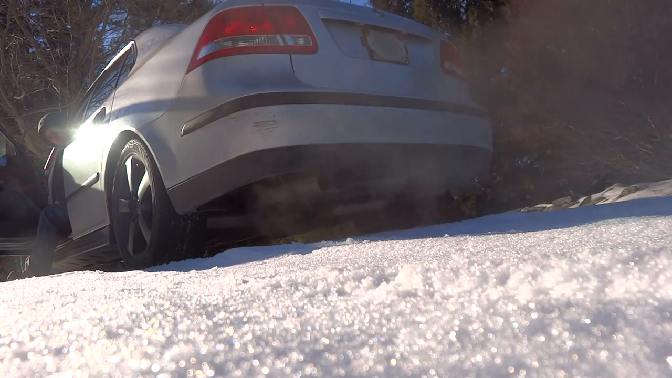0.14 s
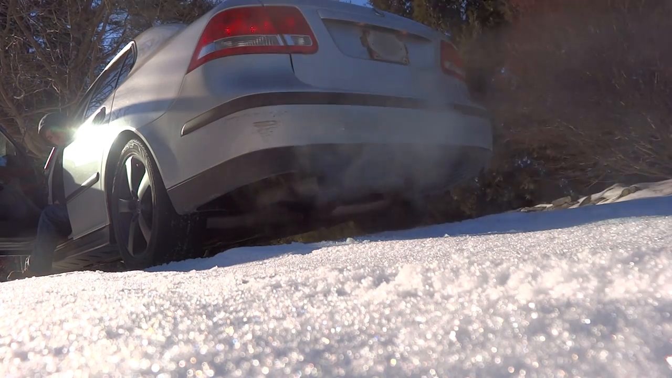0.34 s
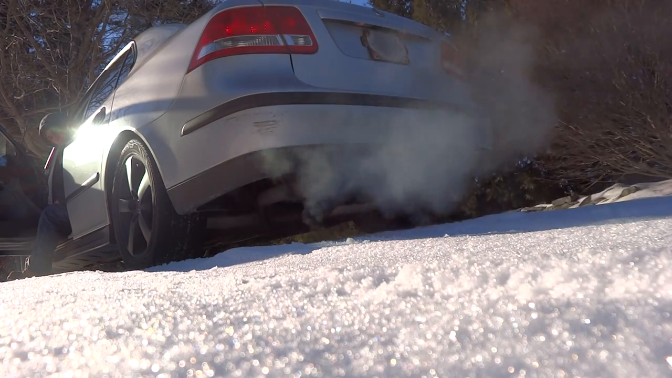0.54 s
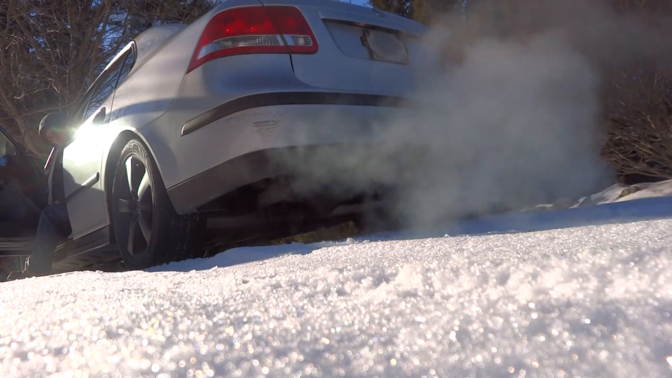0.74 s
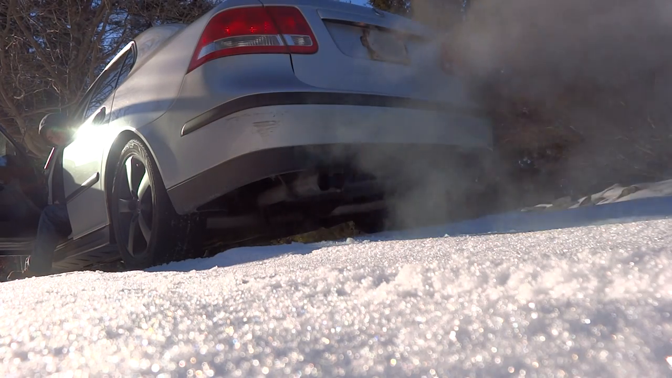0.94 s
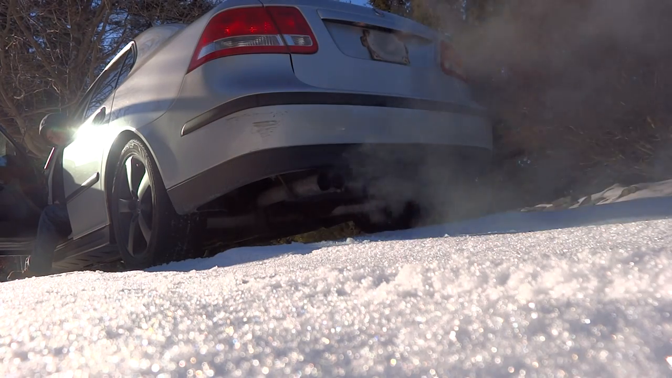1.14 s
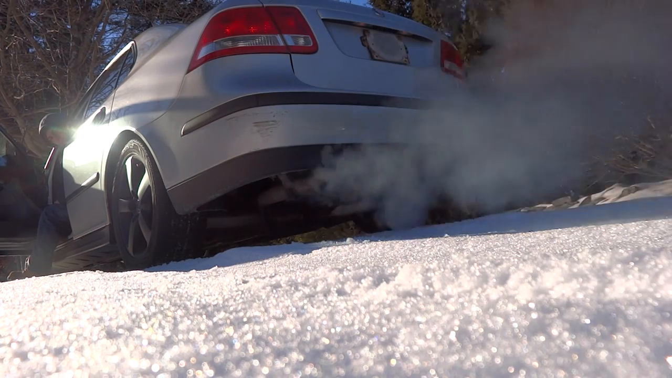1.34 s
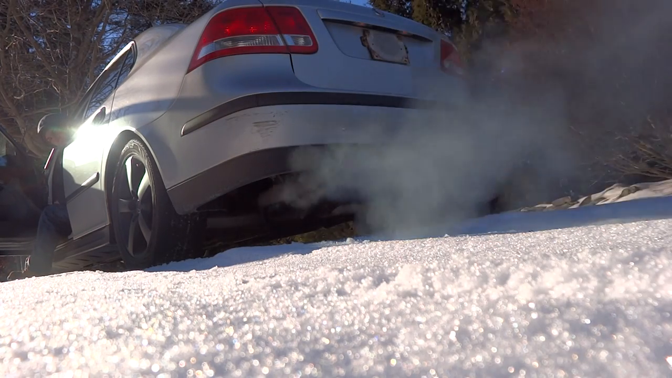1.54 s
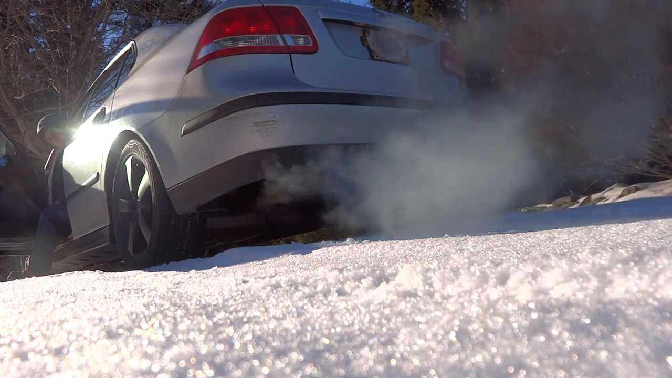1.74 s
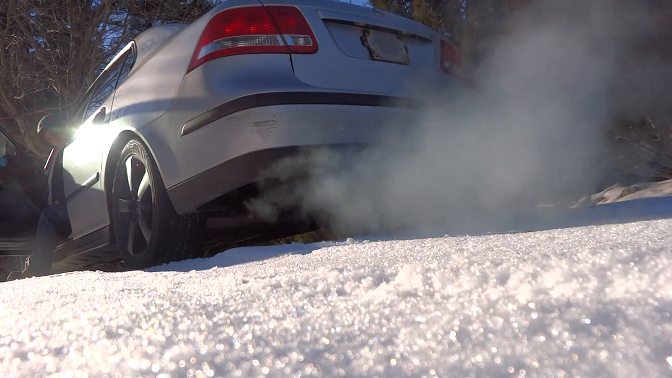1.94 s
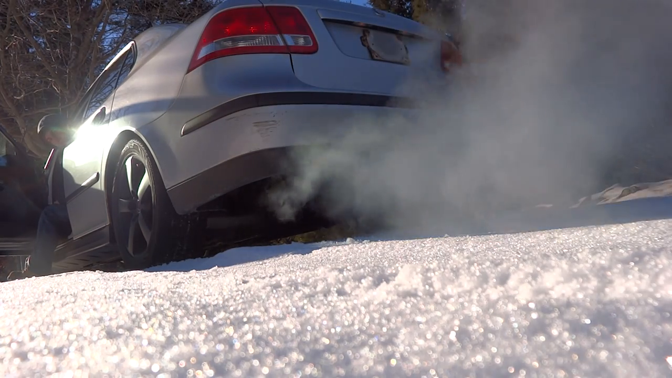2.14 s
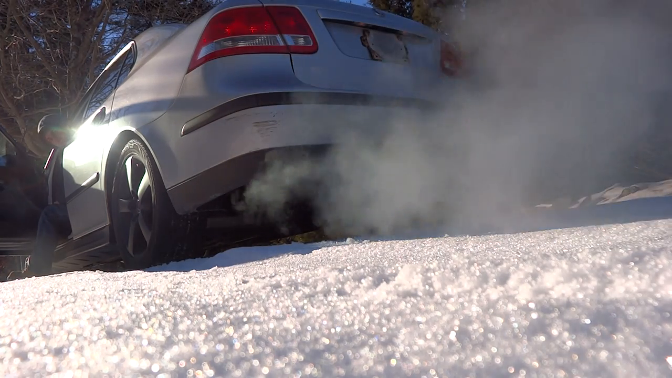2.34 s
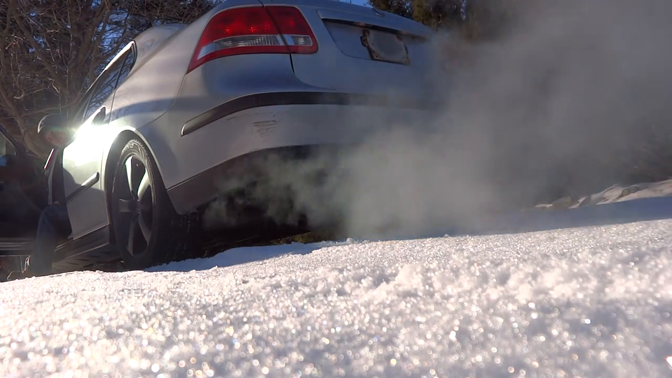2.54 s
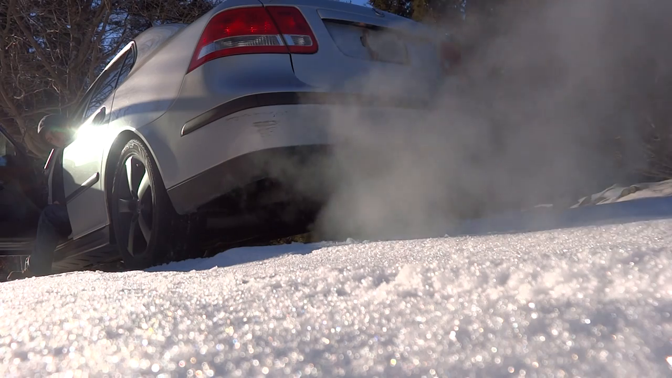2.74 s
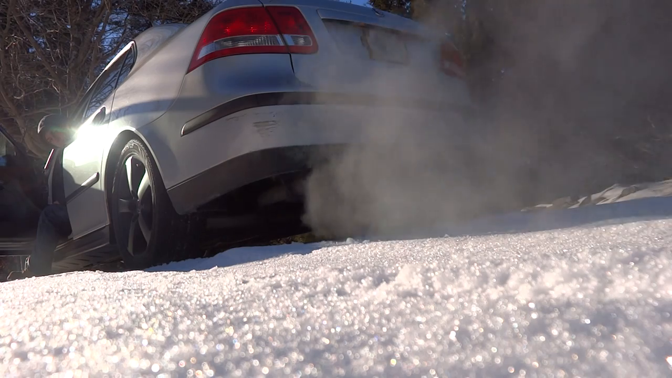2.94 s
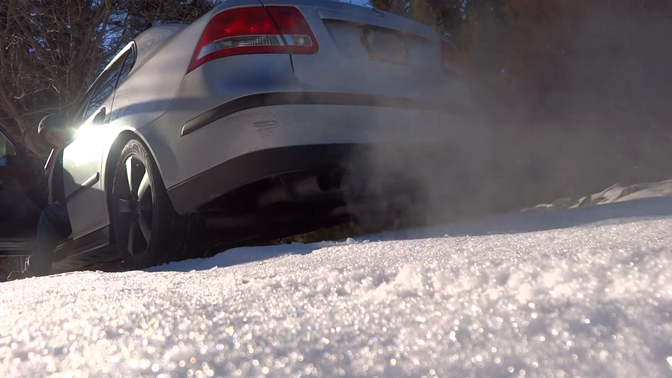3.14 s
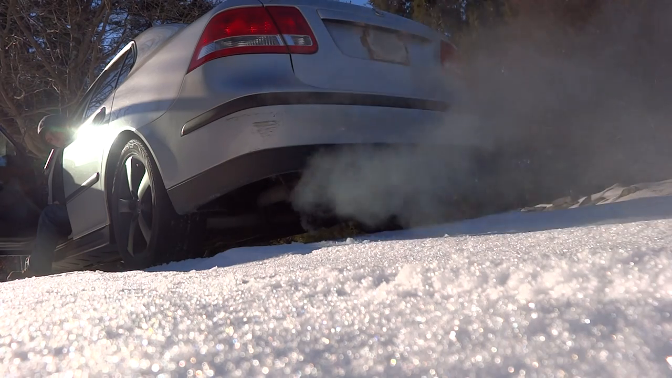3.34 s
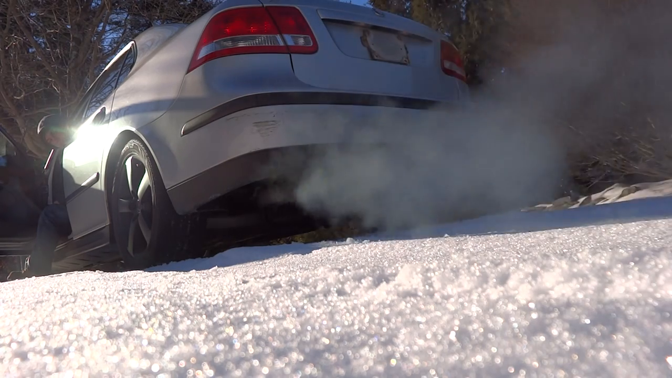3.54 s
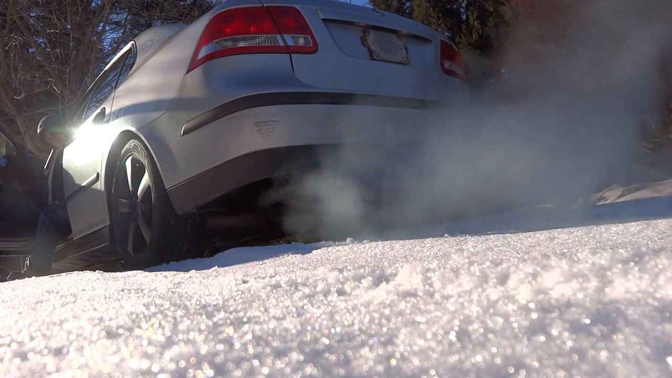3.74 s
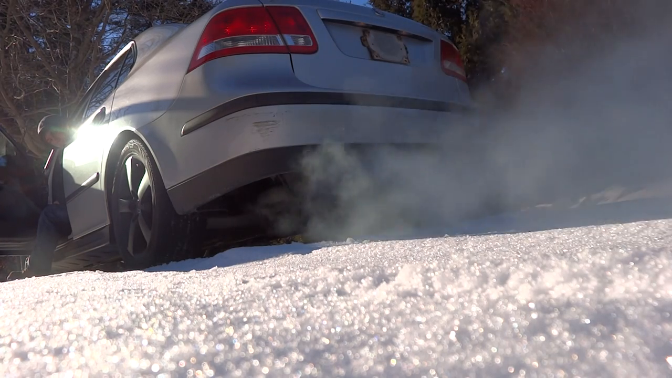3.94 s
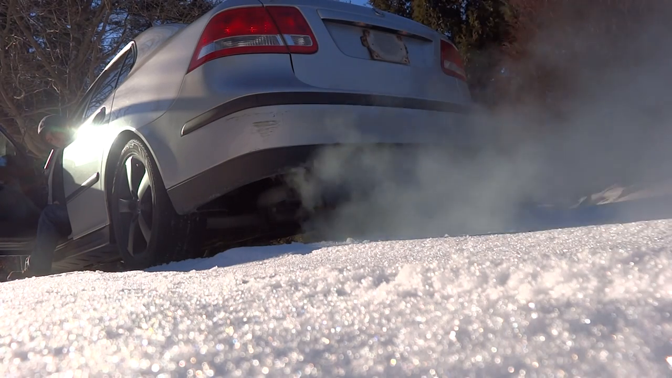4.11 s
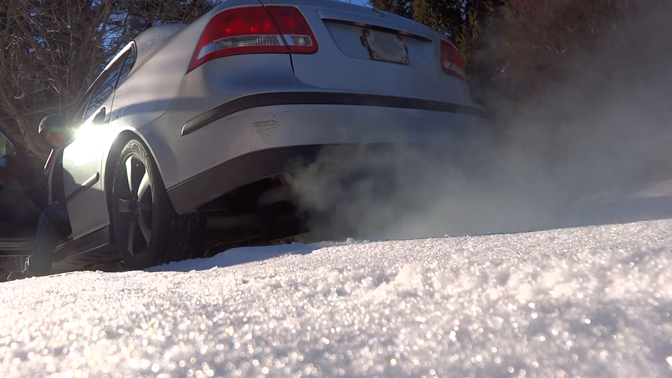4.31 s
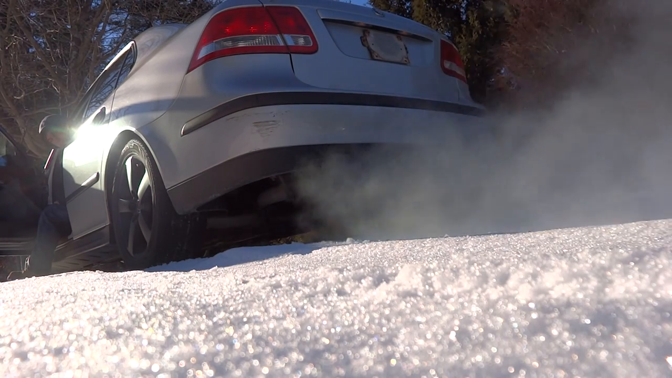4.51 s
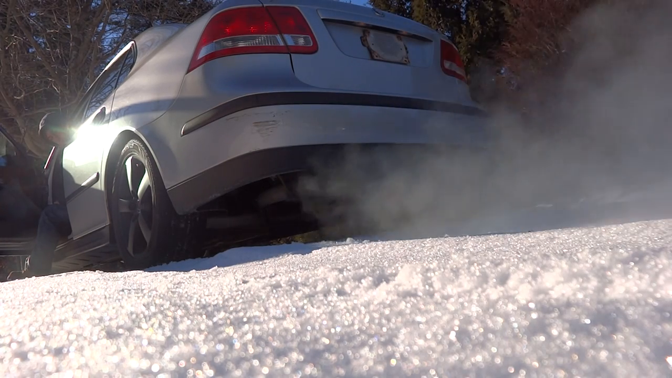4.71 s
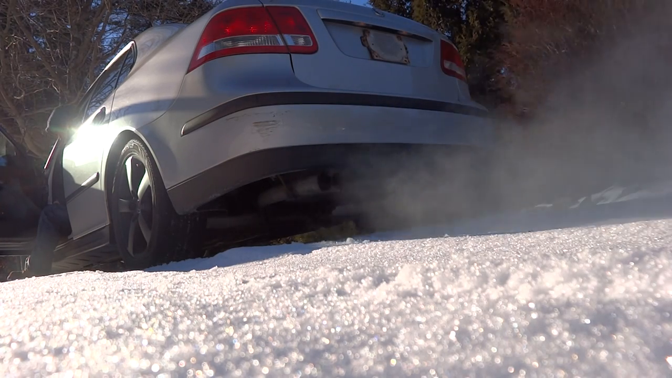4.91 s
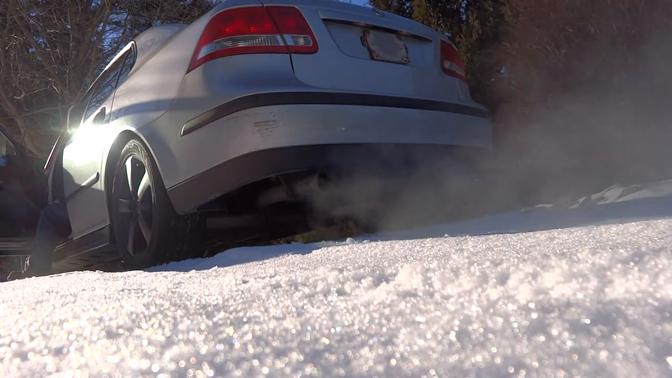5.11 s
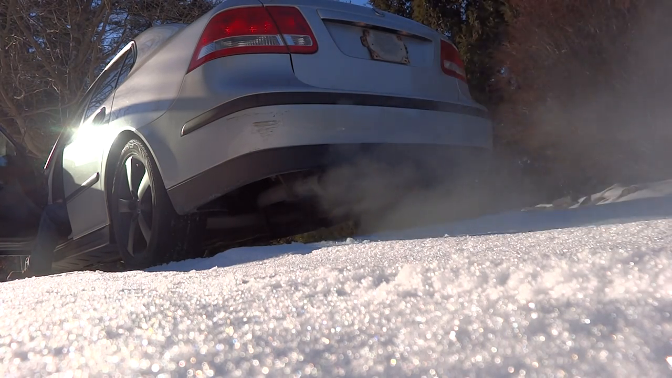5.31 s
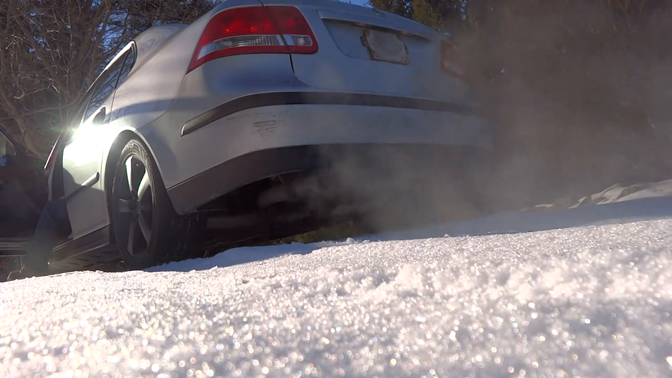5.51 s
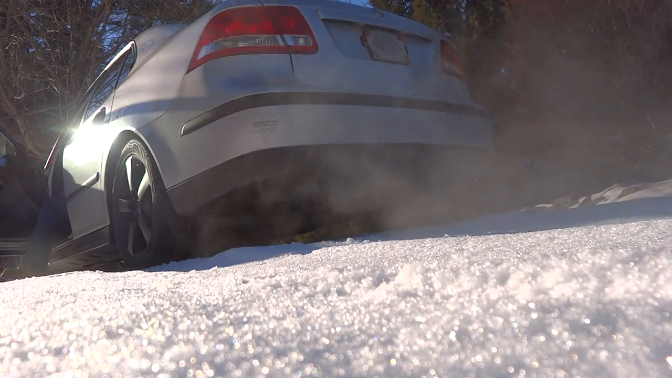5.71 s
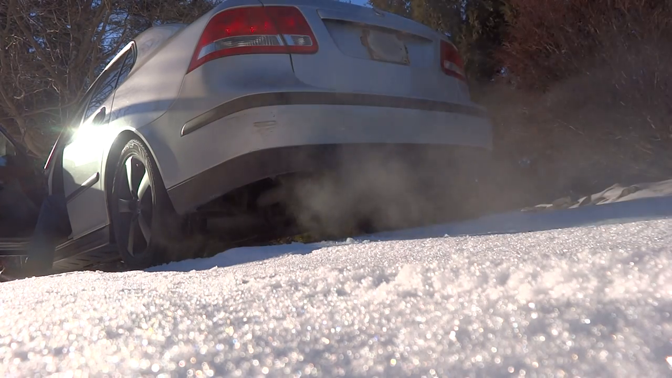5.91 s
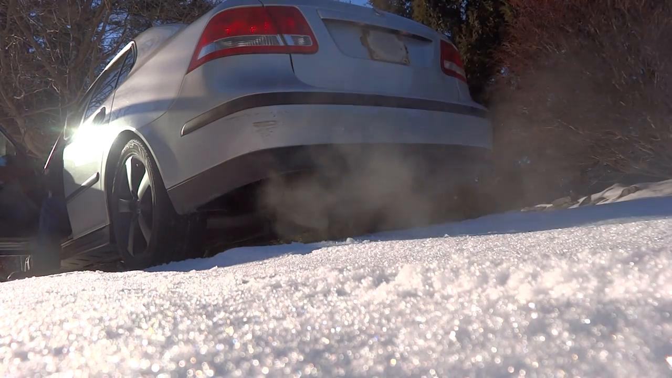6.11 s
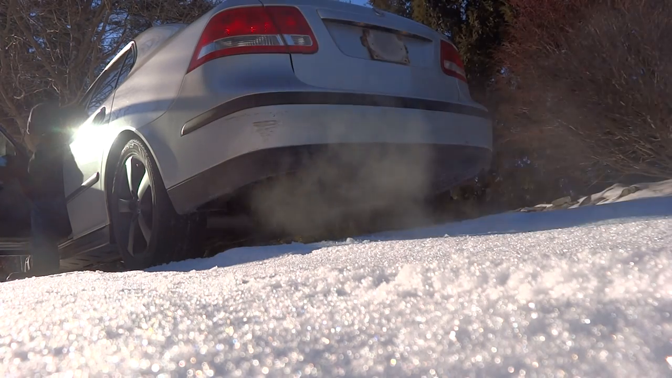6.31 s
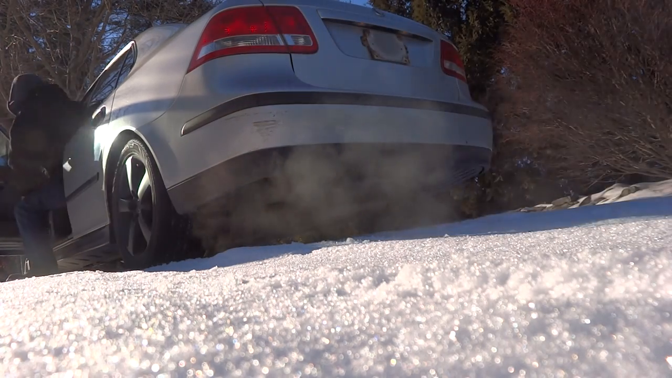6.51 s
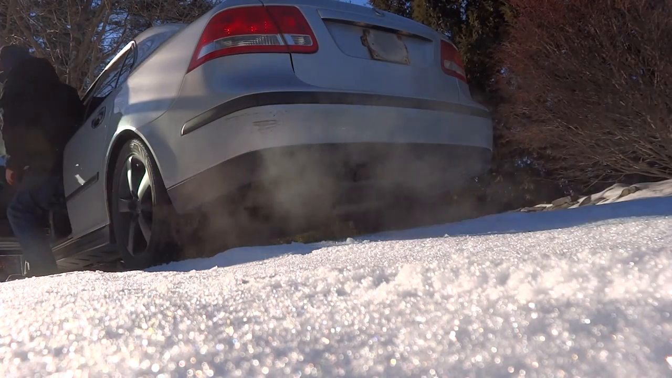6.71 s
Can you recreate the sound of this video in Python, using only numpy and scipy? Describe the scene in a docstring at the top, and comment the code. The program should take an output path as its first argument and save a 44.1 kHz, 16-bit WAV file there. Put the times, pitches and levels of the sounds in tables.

```python
"""A four-cylinder car, heard from behind its exhaust on snow, revs, falls back and sinks to idle.
Each firing sends a pulse down the pipe, which booms when the pulses match one of its own pitches.
The exhaust tips rasp under throttle, burble and crack when it is lifted, and hiss with the gas flow.
At idle a thin whistle glides down. Faint outdoor air lies behind it all."""
import sys
import numpy as np
from scipy import signal
from scipy.fft import irfft
from scipy.io import wavfile
from scipy.ndimage import uniform_filter1d

SR = 44100
rng = np.random.default_rng(int(sys.argv[2]) if len(sys.argv) > 2 else 0)


def output_pcm(signal):
    """Save a mono or channel-first signal as 16-bit PCM at the path in sys.argv[1].

    Samples are clipped to [-1, 1] before scaling.
    """
    pcm = np.clip(np.atleast_2d(signal).T, -1, 1) * 32767
    wavfile.write(sys.argv[1], SR, np.round(pcm).astype(np.int16))


N = 298116
TIME = np.arange(N) / SR
BINS = np.fft.rfftfreq(16384, 1 / SR)  # the pitches at which filters are set, in Hz


# The pitches the pipe rings at (standing waves): pitch_hz, width_hz, relative_db
PIPE_RINGS = [(65.3, 31, -10.5), (109, 34, -6), (152, 24.3, -8), (180.5, 42, -12.5), (235.1, 26.5, -3),
              (285.3, 14.5, -5), (333.1, 45.6, -7.5), (384.5, 19, -10.5), (427, 26.7, -12.5),
              (503.5, 64, -13.5), (565, 34, -17), (641, 73.7, -21), (753, 79, -28.5), (798, 250, -38)]
def pipe_gain(state, leak_db=-44, notch_hz=508, notch_width_hz=15, notch_depth=0.98, top_hz=1700):
    """The pipe as a filter: it rings, lets a little straight through, and its silencer swallows a pitch."""
    cool_hz = BINS / state["stretch"]
    rings = sum(amp(db) ** 2 / (1 + (2 * (cool_hz - hz) / (width * state["widen"])) ** 2) ** 2
                for hz, width, db in PIPE_RINGS)
    pipe = np.sqrt(rings + amp(leak_db) ** 2)
    pipe *= 1 - notch_depth / (1 + ((BINS - notch_hz) / notch_width_hz) ** 2)
    return pipe / np.sqrt((1 + (BINS / top_hz) ** 8) * (1 + (state["low_cut_hz"] / (BINS + 1)) ** 4))


def exhaust_note(count, strength, suck=0.53, swirl=0.045, rough_swirl=0.55, stumble_db=-2, burn_db=2):
    """The main boom: one push of pressure per firing, mixed with swirling gas, rings the pipe."""
    coasting = shares()[0]
    cycle = np.cos(2 * np.pi * count)
    softness = setting("softness") + 0.44 * octaves() * coasting - 0.8 * afterburn()
    r = amp(-np.maximum(softness, .5))  # size of each overtone next to the one below
    pulse = 1 / (1 - 2 * r * cycle + r ** 2) - 1 / (1 + r) ** 2
    pulse *= (1 - r ** 2) / r  # keeps the lowest tone equally loud at any softness
    mean = 2 / (1 + r)
    eddies = colour(noise(), spectrum([(30, 1), (120, 9), (350, 25.3), (700, 22.5), (1500, 2)]))
    gusts = np.sqrt(.25 + abs(pulse) / mean)
    suction = suck * coasting * cycle  # a shut throttle pumps the gas smoothly to and fro
    drive = (pulse - mean) * strength + suction + (swirl + rough_swirl * roughness()) * eddies * gusts
    drive *= amp(level("note") + stumble_db * stumbling() + burn_db * afterburn())
    return sum(colour(drive * share, pipe_gain(state)) for share, state in zip(shares(), STATES))


# How each cylinder differs at full imbalance, in firing order: extra_strength, late_firings
CYLINDER_QUIRKS = [(0.08, 0.032), (-0.16, -.08), (-0.16, 0.095), (0.063, -0.042)]
def firings(scatter=0.42, jitter=0.14):
    """A running count of firings and their strength; uneven cylinders and rough burning upset both."""
    imbalance, rough = setting("imbalance"), roughness()
    count = np.cumsum(firing_hz()) / SR + 0.15
    beats = np.arange(int(count[-1]) + 3)
    timing_luck, strength_luck = rng.standard_normal((len(beats), 2)).T
    extra, late = np.array(CYLINDER_QUIRKS)[beats % len(CYLINDER_QUIRKS)].T
    wobble = jitter * rough * np.interp(count, beats, timing_luck)
    count = count - imbalance * np.interp(count, beats, late) + wobble
    nearest = np.round(count).astype(int)
    return count, 1 + imbalance * extra[nearest] + scatter * rough * strength_luck[nearest]


# How fast the engine runs: time_s, firing_rate_hz
ENGINE_SPEED = [(0.0, 135), (0.08, 141.7), (0.14, 135.5), (0.66, 103.7), (0.69, 102.6), (0.78, 122.3),
                (1.0, 162.9), (1.13, 190.6), (1.23, 205.8), (1.3, 193.8), (1.8, 158.0), (2.2, 129.3),
                (2.66, 103.0), (2.78, 120.8), (3.11, 183.2), (3.24, 186.7), (3.9, 138.4), (4.3, 114.6),
                (4.8, 86.37), (5.4, 57.76), (5.75, 41.03), (5.95, 34.6), (6.25, 29.63), (6.76, 29.27)]
MID_HZ = 100
def firing_hz():
    """Firings per second at each moment."""
    return curves(ENGINE_SPEED)[0]


def octaves():
    """Engine speed in octaves (doublings) above MID_HZ."""
    return np.log2(firing_hz() / MID_HZ)


# Each stab of the throttle: pressed_s, lifted_s, stumble_end_s, afterburn_end_s
THROTTLE_STABS = [(-0.1, 0.095, 0.15, 0.375), (0.642, 1.212, 1.44, 1.33), (2.652, 3.19, 3.31, 3.36)]
def shares(idle_from_s=5.93):
    """How much the engine is coasting, pulling and idling, each from 0 to 1."""
    pulling = sum(during(pressed, lifted) for pressed, lifted, _, _ in THROTTLE_STABS)
    idling = during(idle_from_s, np.inf)  # fuel returns to hold the idle
    return 1 - pulling - idling, pulling, idling


def stumbling():
    """1 while the firing is ragged, just after the throttle lifts."""
    return sum(during(lifted, end) for _, lifted, end, _ in THROTTLE_STABS)


def afterburn():
    """1 while unburnt fuel burns in the pipe after the throttle lifts."""
    return sum(during(lifted, end) for _, lifted, _, end in THROTTLE_STABS)


def roughness():
    """How unevenly the fuel burns: most after a lift, and more as the engine coasts to a crawl."""
    return setting("rough") + 0.42 * stumbling() + 0.14 * shares()[0] * np.maximum(-octaves(), 0)


# The engine's states. _db: relative level at MID_HZ; _slope: dB gained per octave of speed;
# softness: dB lost per overtone; imbalance, rough: 0-1; low_cut_hz: burning firings lack bass;
# stretch, widen: factors by which hot, fast gas raises and widens the pipe's rings
COASTING = dict(note_db=-14, note_slope=8.6, softness=1.52, imbalance=0.17, rough=.08, stretch=1.005, widen=0.99, low_cut_hz=10, rasp_db=-51, rasp_slope=13.76, stream_db=-61, stream_slope=7.7)
PULLING = dict(note_db=-11, note_slope=5.2, softness=1.0, imbalance=.42, rough=0.032, stretch=1.061, widen=1.56, low_cut_hz=167, rasp_db=-38.5, rasp_slope=7.87, stream_db=-65, stream_slope=18)
IDLING = dict(note_db=-16.5, note_slope=0, softness=2.3, imbalance=0.053, rough=0.042, stretch=0.96, widen=1, low_cut_hz=120, rasp_db=-76, rasp_slope=0, stream_db=-97, stream_slope=0)
STATES = [COASTING, PULLING, IDLING]
def setting(name):
    """One engine setting, blended as the state changes."""
    return sum(share * state[name] for share, state in zip(shares(), STATES))


def level(layer):
    """A layer's base level in dB, following the engine's state and speed."""
    return setting(layer + "_db") + setting(layer + "_slope") * octaves()


# The tone of the rasp: pitch_hz, relative_db
RASP_TONE = [(300, -12), (700, 9), (1000, -3), (1400, -3), (1700, -1), (2400, -6.5), (3200, -9),
             (4200, -18.5), (5500, -25.5), (8000, -28.5), (16000, -53)]
def rasp(count, strength, puff_s=0.0032, between=0.15, lag=0.089, scatter_db=3, boost_db=4):
    """Each firing blows a puff of churning gas out of the tips."""
    beat, phase = np.divmod(count + 1 - lag, 1)
    age_s = phase / firing_hz()
    size = amp(scatter_db * noise()[beat.astype(int)]) * np.sqrt(abs(strength))
    puffs = noise() * (between + size * np.exp(-age_s / puff_s))
    return amp(rasp_level() + boost_db) * steady(colour(puffs, spectrum(RASP_TONE) * tailpipe()))


def rasp_level(chuff_db=-55, burn_db=6, stumble_db=-4, flare_hz=159, flare_width_hz=5, flare_db=5):
    """Rasp in dB grows with speed and fuel; coasting, it flares at one speed and keeps a dry chuff."""
    coasting = shares()[0]
    flare = flare_db * np.exp(-((firing_hz() - flare_hz) / flare_width_hz) ** 2)
    db = level("rasp") + burn_db * afterburn() + coasting * flare + stumble_db * stumbling()
    return 20 * np.log10(np.hypot(amp(db), coasting * amp(chuff_db)))


def tailpipe(round_trip_hz=454, echo=0.2):
    """A flipped echo from the open tip lifts evenly spaced bands of pitch."""
    return 1 / abs(1 + echo / (1 + (BINS / 4000) ** 2) * np.exp(2j * np.pi * BINS / round_trip_hz))


# The tone of the shock fronts: pitch_hz, relative_db
SHOCK_TONE = [(500, -7.5), (900, 4.5), (1500, 4.5), (3000, 6), (5000, -9), (6200, -17), (9000, -23.5),
              (16000, -50.5)]
def shocks(count, strength, scatter_db=4, shock_db=-40, full_rasp_db=-38, steepening=1.56):
    """Strong pulses steepen along the pipe into sharp clicks, which grow faster than the rasp."""
    fronts = np.diff(np.floor(count), prepend=0) * strength * amp(scatter_db * noise())
    level_db = shock_db + steepening * (rasp_level() - full_rasp_db)
    return amp(level_db) * steady(colour(fronts, spectrum(SHOCK_TONE) * tailpipe()))


# Bursts of unburnt fuel cracking in the pipe: start_s, length_s, relative_db, fade_db
CRACK_VOLLEYS = [(1.239, 0.03798, -22, -9.5), (1.354, 0.118, -21, -9), (3.104, 0.065, -35, -21),
                 (3.251, 0.0061, -26, 0), (3.274, 0.055, -33, -5)]
# The tone of a crack: pitch_hz, gain_db
CRACK_TONE = [(400, -1), (1500, 0), (3500, 3.5), (6000, -3.5), (9000, -6), (13000, -13), (16000, -27)]
def cracks(count, scatter_db=2, spit_s=0.00077, tail_s=0.01, tail=0.11, snap=3, trim_db=-3, size=900):
    """One crack per firing through each volley: a sharp snap with a short spit of noise behind it."""
    out, t = np.zeros(N + size), np.arange(size) / SR
    firing_s = np.flatnonzero(np.diff(np.floor(count)) > 0) / SR
    decay = np.exp(-t / spit_s) + tail * np.exp(-t / tail_s)
    for start, length, db, fade_db in CRACK_VOLLEYS:
        for s in firing_s[(firing_s >= start) & (firing_s < start + length)]:
            burst = rng.standard_normal(size) * decay + snap * (t == 0)
            level_db = db + trim_db + fade_db * (s - start) / length + scatter_db * rng.standard_normal()
            out[int(s * SR):][:size] += amp(level_db) * unit(burst)
    return colour(out[:N], spectrum(CRACK_TONE))


# The tone of the escaping gas: pitch_hz, relative_db
HISS_TONE = [(1000, 2), (4500, -8.5), (7000, -1), (9500, 1), (12000, 0.5), (13800, -2.5), (14800, -10.5),
             (16000, -26)]
def hiss(count, lag=0.41, surge_db=-39, surge_slope=-8, burn_db=7, least_db=-77, trim_db=-1.5):
    """Gas streams from the tips; while coasting, it surges when the firings match a ring of the pipe."""
    hz = firing_hz()
    stream = amp(level("stream") + burn_db * (afterburn() - stumbling()) + trim_db)
    ringing = np.interp(hz, BINS, pipe_gain(COASTING))
    surge = shares()[0] * amp(surge_db + surge_slope * octaves()) * ringing ** 1.85
    throb = 0.54 * (MID_HZ / hz) ** 0.47  # slow firings come as separate spurts
    flow = noise() * np.exp(throb * np.cos(2 * np.pi * (count - lag)))
    loudness = np.sqrt(stream ** 2 + surge ** 2 + amp(least_db) ** 2)
    return loudness * steady(colour(flow, spectrum(HISS_TONE)))


# The path of the whistle: time_s, pitch_hz, level_db
WHISTLE_GLIDE = [(5.3, 4999, -100), (5.65, 4700, -78), (5.85, 4400, -109), (5.95, 3970, -72),
                 (6.08, 3855, -72), (6.2, 3410, -80.5), (6.42, 2870, -79), (6.63, 2410, -59),
                 (6.76, 2400, -59)]
def whistle(count, width_hz=85, flutter=0.48):
    """A breathy whistle flutters with the firings and sinks as the engine settles."""
    hz, db = curves(WHISTLE_GLIDE)
    blur = 1 / (1 + (BINS / width_hz) ** 2)
    breath = colour(noise(), blur) + 1j * colour(noise(), blur)
    tone = (breath * np.exp(2j * np.pi * np.cumsum(hz) / SR)).real  # slides the noise up to the pitch
    return amp(db) * unit(tone * (1 + flutter * np.cos(2 * np.pi * count)))


def whine(pitch_hz=8350, level_db=-72, start_s=5.6):
    """A faint, steady high tone comes in near idle."""
    return amp(level_db) * during(start_s, np.inf) * unit(np.sin(2 * np.pi * pitch_hz * TIME))


# The tone of the background: pitch_hz, relative_db
AIR_TONE = [(20, -16.5), (100, -2), (300, -19), (700, -41), (2000, -34.5), (5000, -54), (9000, -40),
            (16000, -47)]
def outdoor_air(level_db=-60):
    """A quiet, even rumble."""
    return amp(level_db) * unit(colour(noise(), spectrum(AIR_TONE)))


def amp(db):
    """Decibels to gain."""
    return 10 ** (np.asarray(db) / 20)


def curves(rows):
    """Every column of a timed table, at every sample."""
    s, *columns = np.transpose(rows)
    return [np.interp(TIME, s, c) for c in columns]


def during(start, end, ramp_s=0.029):
    """1 between two times, with short ramps."""
    return np.clip(np.minimum(TIME - start, end - TIME) / ramp_s + .5, 0, 1)


def spectrum(points):
    """A filter's gains from (pitch_hz, gain_db) points."""
    hz, db = np.transpose(points)
    return amp(np.interp(np.log(BINS + 1), np.log(hz), db))


def colour(x, gain):
    """Filters a sound so that it rings after a pulse, never before."""
    log_gain = np.log(np.maximum(gain, gain.max() * 1e-5))
    mirrored = np.r_[log_gain, log_gain[-2:0:-1]]
    response = np.fft.ifft(np.exp(np.conj(signal.hilbert(mirrored)))).real
    return signal.oaconvolve(x, response[:len(BINS)])[:N]


def unit(x):
    """Scales the average level (rms) to 1."""
    return x / np.sqrt(np.mean(x ** 2) + 1e-20)


def steady(x, size=1500):
    """Holds the running level at 1 and keeps the pulses."""
    return x / np.sqrt(smooth(x ** 2, size) + 1e-12)


def smooth(power, size):
    """Averages twice over size samples."""
    return abs(uniform_filter1d(uniform_filter1d(power, size), size))


def noise():
    """White noise."""
    return rng.standard_normal(N)


# Which side is louder: pitch_hz, left_minus_right_db
SIDE_BALANCE = [(60, -4), (110, -7), (200, -4), (380, -4), (700, 2), (1300, 0)]
# How much of that applies: time_s, share
SIDE_AMOUNT = [(0, 1), (5.2, 0.87), (5.7, 0.34), (6.1, 0.21)]
def scene():
    """The car and the air in stereo. Snow gives no echo; the bass leans right, less so towards idle."""
    count, strength = firings()
    car = exhaust_note(count, strength) + rasp(count, strength) + shocks(count, strength)
    mid = car + cracks(count) + hiss(count) + whistle(count) + whine() + outdoor_air()
    ratio = spectrum(SIDE_BALANCE)
    lean = np.fft.fftshift(irfft((ratio - 1) / (ratio + 1)))[1:]
    side = curves(SIDE_AMOUNT)[0] * signal.oaconvolve(mid, lean, "same")
    return np.array([mid + side, mid - side])


def record(dry, limit_db=-10, top_hz=15900):
    """A limiter holds loud moments down and rounds off peaks; then the highest treble is cut."""
    power = smooth((dry ** 2).mean(0), size=700)
    held = dry / np.maximum(np.sqrt(power) / amp(limit_db), 1)
    rounded = held / (1 + held ** 8) ** (1 / 8)
    treble_cut = signal.firwin(511, top_hz, window=("kaiser", 9), fs=SR)
    return signal.oaconvolve(rounded, treble_cut[None], "same")


dry = scene()
out = record(dry)
output_pcm(out)
```